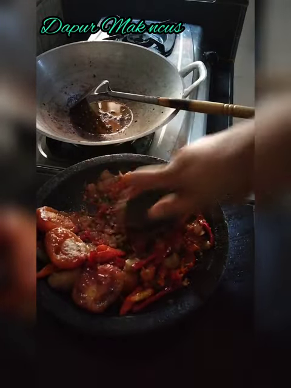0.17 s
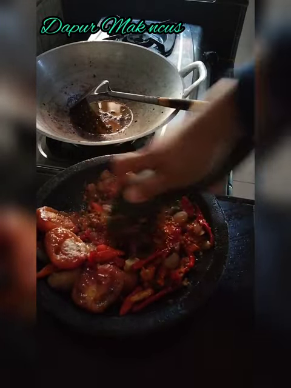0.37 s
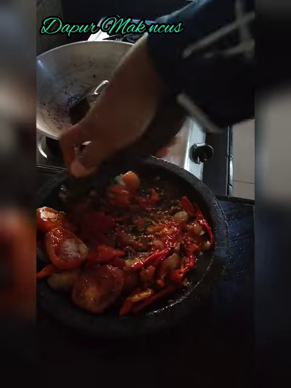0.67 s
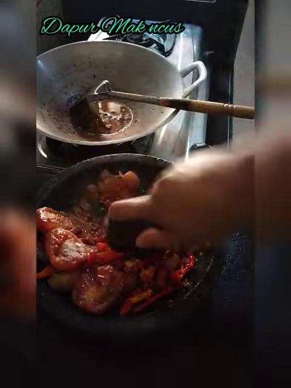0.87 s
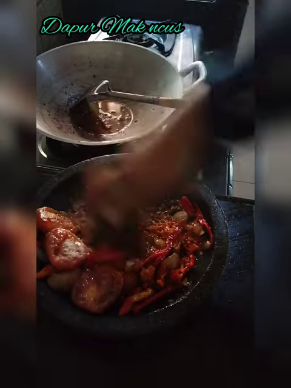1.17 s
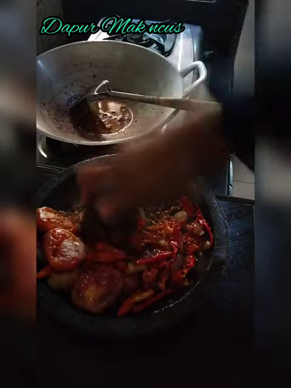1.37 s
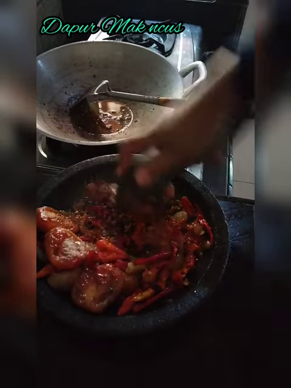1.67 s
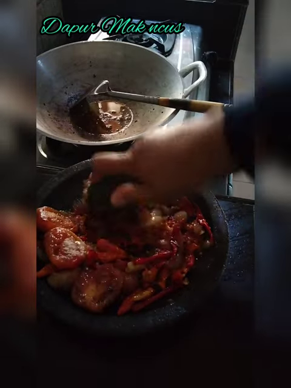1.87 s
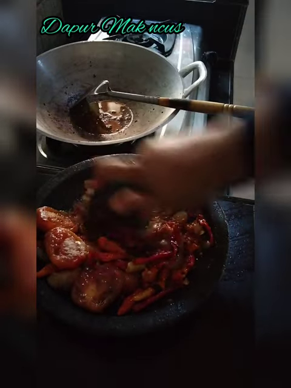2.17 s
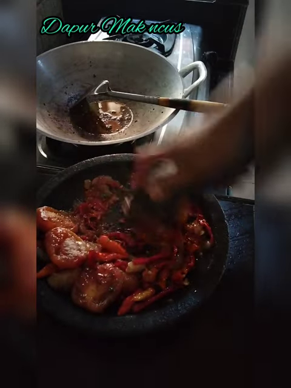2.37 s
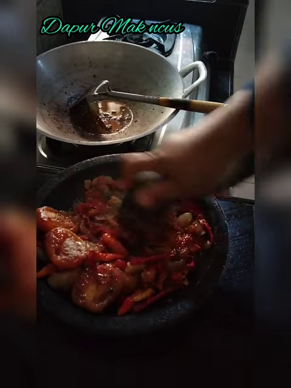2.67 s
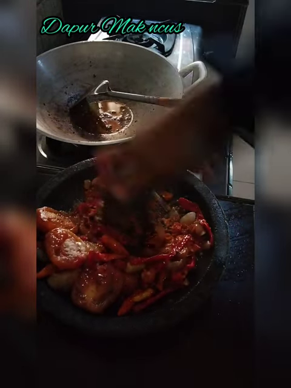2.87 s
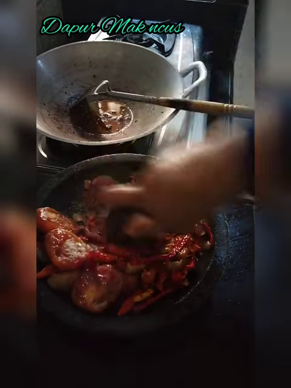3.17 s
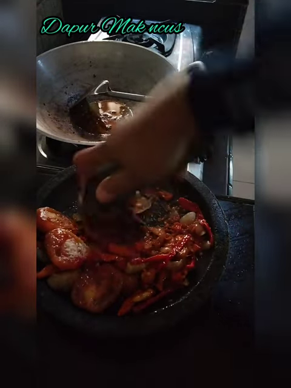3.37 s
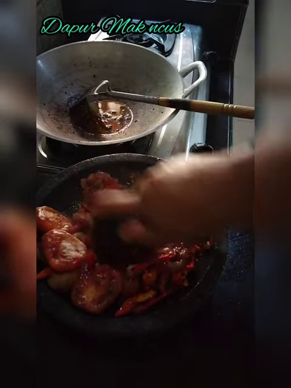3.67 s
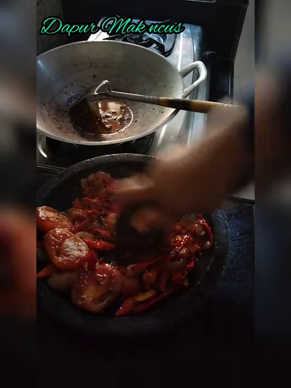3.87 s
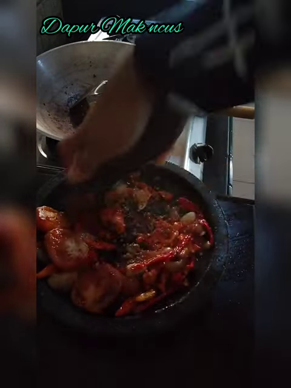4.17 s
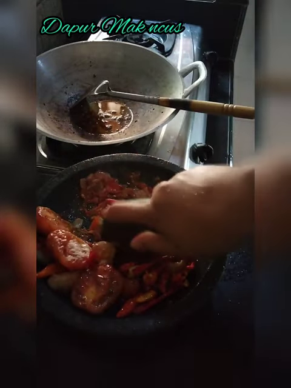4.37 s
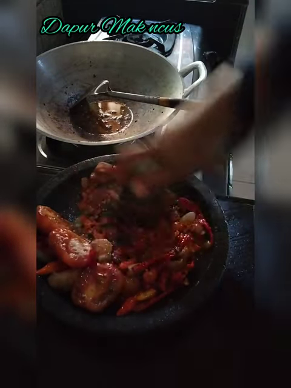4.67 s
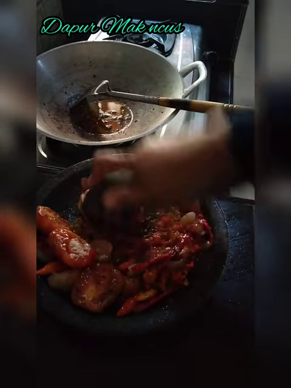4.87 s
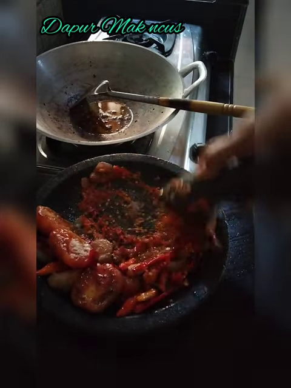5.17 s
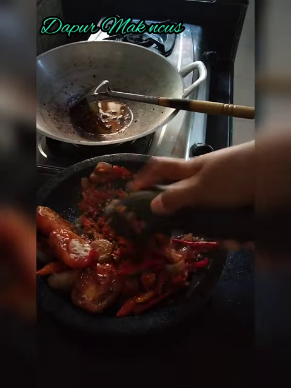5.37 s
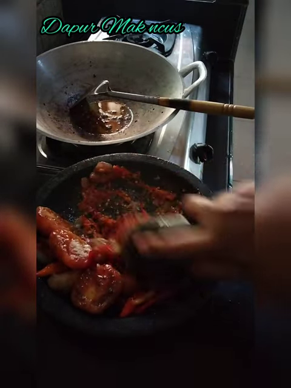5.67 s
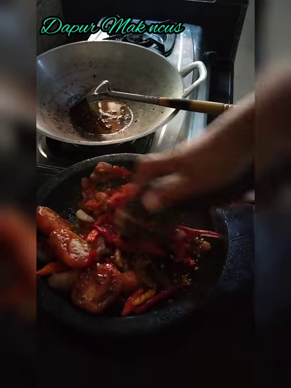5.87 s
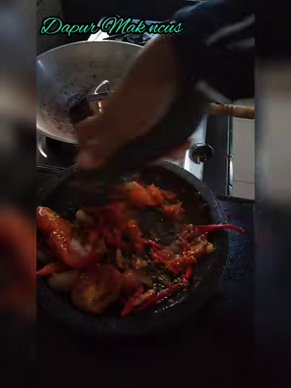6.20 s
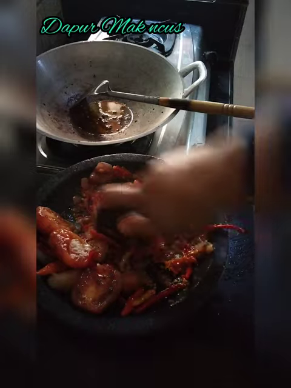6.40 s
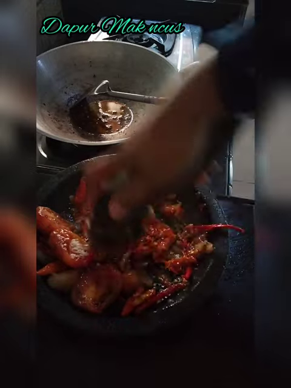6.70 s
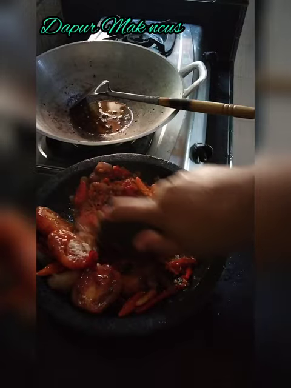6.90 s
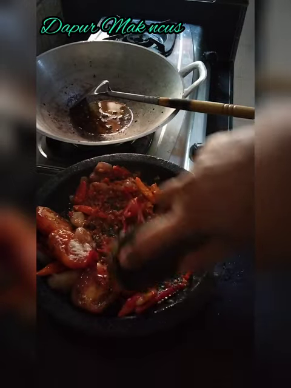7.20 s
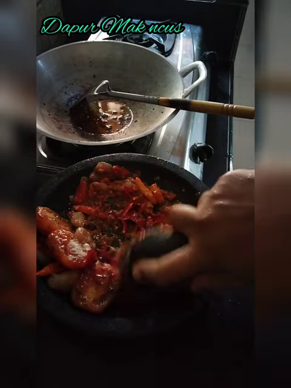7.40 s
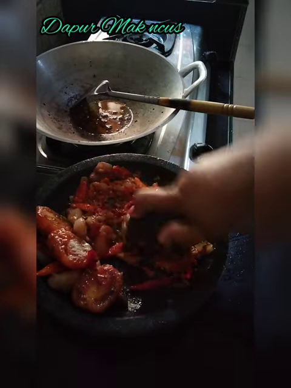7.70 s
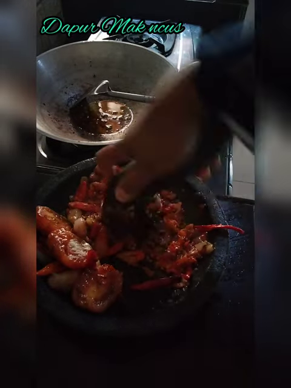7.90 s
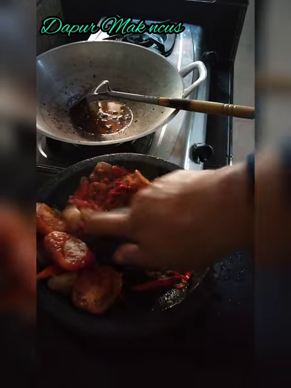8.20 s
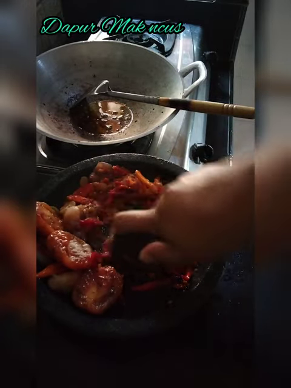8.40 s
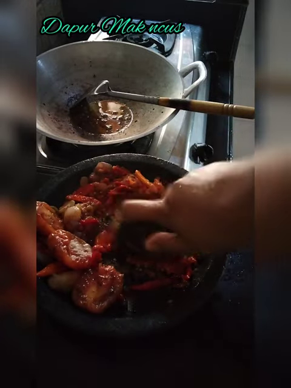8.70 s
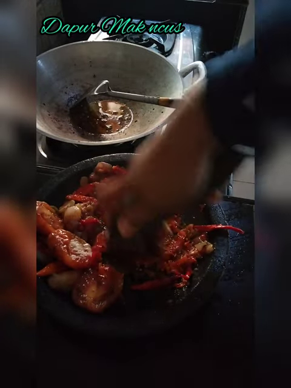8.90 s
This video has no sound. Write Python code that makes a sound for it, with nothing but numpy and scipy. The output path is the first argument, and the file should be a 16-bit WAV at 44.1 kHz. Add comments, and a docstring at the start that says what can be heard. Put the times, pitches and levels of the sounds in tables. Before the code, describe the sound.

A stone pestle crushes chillies and tomatoes in a stone mortar, heard close up in a small, quiet kitchen. From the start, uneven strokes come roughly every half second to second, each a soft, wet squelch with fizzing juice, dull rubbing and a low rumble through the worktop. Skins pop and snap throughout, now and then with a tiny squeak. Short, gritty scrapes come at about 0.2, 1.8 and 2.5 seconds. At 2.2 seconds stone hits stone with the loudest knock, a hard crack that rings briefly into the room, and another follows at 2.9 seconds. The mashing carries on with lighter taps around 4 to 4.5 seconds and crisp, juicy pops near 5 and 5.5 seconds. A third ringing knock lands at about 7.2 seconds, then squelching and popping continue until around 9 seconds.

```python
"""A stone pestle crushes chillies and tomatoes in a stone mortar, close by, in a small kitchen.
Each stroke squeezes air and juice out of the pulp with a squelch and makes the worktop rumble.
Skins pop and squeak, and juice spits. Where stone meets bare stone it grates or knocks,
and the bowl rings briefly into the quiet room."""
import sys
import numpy as np
from scipy import signal
from scipy.fft import rfft, irfft, next_fast_len
from scipy.io import wavfile
from scipy.ndimage import uniform_filter1d, map_coordinates

SR = 44100
rng = np.random.default_rng(int(sys.argv[2]) if len(sys.argv) > 2 else 0)


def file_out(sig):
    """Save sig as 16-bit WAV at sys.argv[1]."""
    # one column per channel
    cols = np.atleast_2d(sig).T
    # limit, then scale
    lim = np.clip(cols, -1, 1)
    pcm = np.round(lim * 32767).astype(np.int16)
    wavfile.write(sys.argv[1], SR, pcm)


N = 399105

# The tones the bowl rings with: pitch_hz, level_db, fade_s (a fade is the time to drop by 60 dB)
BOWL_TONES = [(780, -19.5, 0.016), (1325, -25.5, 0.086), (1554.2, -2, 0.066), (2090, -38, 0.038),
              (2710, -38, 0.048), (3300, -33, 0.088), (3406, -32.5, .07), (5060, -56.5, 0.12),
              (7160, -47, .12), (9320, -55, .04)]
# The tone colour of spraying juice: pitch_hz, level_db
FIZZ_COLOUR = [(2500, -25.5), (4200, -2.5), (5200, -2), (6200, -2.5), (7700, 2.5), (9000, -3),
               (12000, -9.5), (14500, -4), (16000, -9)]


def amp(db):
    """Turn decibels into a gain to multiply by."""
    return 10 ** (np.asarray(db) / 20)


def unit(x):
    """Scale a sound to an average (rms) level of 1."""
    return x / np.sqrt(np.mean(x ** 2) + 1e-20)


def along(points, hz):
    """Read between (pitch_hz, value) points on a logarithmic pitch scale."""
    pitches, values = np.transpose(points)
    return np.interp(np.log(hz + 1), np.log(pitches + 1), values)


def add(track, start_s, sound):
    """Mix a sound into a track."""
    start = max(round(start_s * SR), 0)
    part = track[start:start + len(sound)]
    part += sound[:len(part)]


def filtered(x, response):
    """Multiply each frequency in a sound by response(hz)."""
    size = next_fast_len(len(x) + 8192)
    return irfft(rfft(x, size) * response(np.fft.rfftfreq(size, 1 / SR)), size)[:len(x)]


def coloured(x, colour, size=4096):
    """Give a sound a tone colour; only the balance between the (pitch_hz, level_db) points counts."""
    cepstrum = irfft(np.log(amp(along(colour, np.fft.rfftfreq(size, 1 / SR)))))
    cepstrum[1:size // 2] *= 2  # folded so the filter never sounds ahead of its input
    cepstrum[size // 2 + 1:] = 0
    response = irfft(np.exp(rfft(cepstrum)))
    return signal.fftconvolve(x, response / np.linalg.norm(response))[:len(x)]


def resonant(x, peaks):
    """Pass a sound through resonances: pitch_hz, width_hz, level_db."""
    return filtered(x, lambda f: sum(amp(db) * 1j * f * width / (hz * hz - f * f + 1j * f * width)
                                     for hz, width, db in peaks))


def narrow_noise(samples, pitch_hz, width_hz):
    """Noise gathered around one pitch."""
    return unit(filtered(rng.standard_normal(samples), lambda f: np.exp(-((f - pitch_hz) / width_hz) ** 2)))


def wobble(per_s):
    """A smooth random curve through per_s points a second."""
    return map_coordinates(rng.standard_normal(int(N * per_s / SR) + 4), [np.arange(N) * per_s / SR])


def swells(rows):
    """A rounded rise and fall in level for each row."""
    gain = np.zeros(N)
    for start_s, length_s, db in rows:
        add(gain, start_s, amp(db) * signal.windows.tukey(int(length_s * SR) + 2, .5))
    return gain


def held(start_s, length_s, rise_s, fall_db_per_s):
    """The level of one hand movement: it rises, holds, and dies away after length_s."""
    gain, t = np.zeros(N), np.arange(int((length_s + 1) * SR)) / SR
    add(gain, start_s, np.minimum(t / rise_s, 1) * amp(-fall_db_per_s * np.maximum(t - length_s, 0)))
    return gain


def background():
    """A very quiet room, with a faint thin whistle now and then."""
    # When the whistle sounds: start_s, length_s, level_db
    whistles = [(1.75, 0.17, -68), (6.06, 0.099, -72.5), (7.03, 0.13, -85), (7.62, 0.29, -77)]
    # The tone colour of the room's air: pitch_hz, level_db
    air_colour = [(30, 1.5), (130, 10), (400, -17), (2000, -22), (16000, -21)]
    whistle = narrow_noise(N, pitch_hz=7300, width_hz=260)
    air = unit(coloured(rng.standard_normal(N), air_colour))
    return swells(whistles) * whistle + amp(-86) * air


def kitchen_echo(x, delay_s=.012, size=256):
    """The room answers with a wash of echoes, each pitch dying at its own speed."""
    # How long the room rings: pitch_hz, fade_s
    fades = [(100, 0.44), (400, 0.47), (1000, 0.96), (1600, 0.78), (3000, 0.78), (6000, 0.29),
             (14000, 0.45)]
    hz, t, bands = signal.stft(rng.standard_normal(SR), SR, nperseg=size)
    tail = signal.istft(bands * amp(-60 * t / along(fades, hz)[:, None]), SR, nperseg=size)[1]
    tail = np.pad(tail / np.linalg.norm(tail), (int(delay_s * SR), 0))
    return signal.fftconvolve(x, tail)[:len(x)]


def with_near_echoes(x, fade_s=.09, echo_db=-5.5):
    """Add quick echoes from worktop, wok and wall, keeping the same loudness."""
    t = np.arange(SR // 10) / SR
    echoes = rng.standard_normal(len(t)) * amp(-60 * t / fade_s)
    echoes *= amp(echo_db) / np.linalg.norm(echoes)
    echoes[0] = 1  # the direct sound
    return signal.fftconvolve(x, echoes / np.linalg.norm(echoes))[:len(x)]


def drag(rub_gain, roll_gain, rumble_gain):
    """The pressed pestle rolls over lumps: the worktop rumbles and the bowl rubs dully."""
    # The worktop's resonances: pitch_hz, width_hz, level_db
    worktop = [(72, 22, -6.5), (103, 20, 3.5), (150, 25, -7)]
    # The tone colours of rumbling, rolling and rubbing: pitch_hz, level_db
    rumble_colour = [(20, -36), (48, -16.5), (65, 1), (160, 3.5), (260, -13), (700, -45)]
    roll_colour = [(40, -42.5), (100, -9.5), (150, 4.5), (200, 3), (280, -4), (380, -6), (500, -27),
                   (1000, -51)]
    rub_colour = [(90, -22.5), (190, -3.5), (280, -9), (390, 7), (520, -9), (680, 2.5), (1000, -0.5),
                  (1300, -17.5), (2500, -42)]
    lumpy = lambda swing_db, per_s: rng.standard_normal(N) * amp(swing_db * wobble(per_s))
    rumble = unit(coloured(resonant(lumpy(2.5, 50), worktop), rumble_colour))
    roll = unit(coloured(lumpy(2.5, 50), roll_colour))
    rub = unit(coloured(lumpy(4.9, 140), rub_colour))
    return amp(-2) * rumble_gain * rumble + amp(-2.5) * roll_gain * roll + amp(-5.5) * rub_gain * rub


def bowl_ring(t, evenness=0):
    """The bowl's fading tones; evenness (0 to 1) brings the weak ones up towards the strong."""
    return sum(amp(db * (1 - evenness) - 60 * t / fade_s) * np.sin(2 * np.pi * hz * t)
               for hz, db, fade_s in BOWL_TONES)


def bowl_singing(squelch_gain, grit_per_s=700):
    """Seeds and grit under the sliding pestle keep the bowl ringing faintly."""
    grit = (rng.random(N) < grit_per_s / SR) * rng.standard_normal(N)
    ring = bowl_ring(np.arange(SR // 5) / SR, evenness=.45)
    return amp(-9.5) * signal.fftconvolve(unit(grit) * squelch_gain, ring / np.linalg.norm(ring))[:N]


def thumps(fade_s=0.15):
    """The pestle lands on a cushion of pulp, sending a short, low push through bowl and worktop."""
    # The soft landings: start_s, level_db
    landings = [(0.563, -51.5), (1.022, -51), (1.82, -57), (4.044, -59.5), (4.633, -50.5)]
    # Their tone colour: pitch_hz, level_db
    thump_colour = [(40, -43), (120, -0.5), (220, 2), (400, -5.5), (800, -41), (3000, -57.5)]
    track, t = np.zeros(N), np.arange(SR // 4) / SR
    for start_s, db in landings:
        push = rng.standard_normal(len(t)) * amp(-60 * t / fade_s)
        add(track, start_s, amp(db) * coloured(push, thump_colour))
    return track


def squeaks():
    """A wet chilli skin sticks and slips as it escapes from under the pestle."""
    # The slipping skins: start_s, length_s, level_db, pitch_hz
    slips = [(3.472, .018, -50, 2450), (4.124, 0.028, -62, 1980), (6.31, .024, -56.5, 3060),
             (8.045, .04, -57, 3400)]
    track = np.zeros(N)
    for start_s, length_s, db, hz in slips:
        slip = narrow_noise(int(length_s * SR) + 2, hz, width_hz=.12 * hz)
        add(track, start_s, amp(db) * slip * signal.windows.tukey(len(slip), .5))
    return track


def grating(slips_per_s=1400, hiss=0.35):
    """Grains of bare stone catch and break free; each slip jolts the bowl."""
    # The scrapes: start_s, length_s, level_db
    scrapes = [(.075, .046, -56.5), (.172, 0.024, -49), (.186, 0.027, -42.5), (.218, .048, -42),
               (1.818, 0.051, -37.5), (1.985, 0.022, -57.5), (2.515, 0.047, -46.5)]
    # The stone's resonances: pitch_hz, width_hz, level_db
    stone = [(474, 54, 1), (663.7, 45, -1.5), (881, 110, -5.5), (1540, 34, 4.5), (2800, 68, -9.5),
             (3220, 120, -13.5), (4700, 320, -21.5), (6870, 440, -24.5)]
    # The tone colour laid over them: pitch_hz, level_db
    rasp_colour = [(100, -10), (300, 0.5), (3500, 2), (4200, -7.5), (8000, -4.5), (11000, -23),
                   (16000, -11)]
    slips = unit((rng.random(N) < slips_per_s / SR) * rng.standard_normal(N))
    slips += hiss * rng.standard_normal(N)
    rasp = resonant(slips * swells(scrapes), stone) / np.std(resonant(slips, stone))
    return filtered(rasp, lambda hz: amp(along(rasp_colour, hz)))


def pops(squelch_gain, small_per_s=9, small_hz=2800, rise_s=0.00053, fade_s=.042):
    """A skin gives way: a quick cluster of snaps in a small wet hollow, with a spray of droplets."""
    # The loudest bursting skins: start_s, level_db, pitch_hz, spray_db
    big_pops = [(0.026, -45.5, 2080, -77), (.38, -35.5, 2820, -55.5), (0.7358, -38.5, 2760, -66),
                (0.8076, -36, 3020, -56), (0.83, -37.5, 3000, -52), (1.0274, -37.5, 2830, -60),
                (1.4165, -52, 7900, -59.5), (1.515, -50, 2800, -48), (2.048, -40, 1730, -48.5),
                (2.911, -33.5, 1830, -47), (3.0744, -38.5, 2820, -64.5), (3.4812, -39.5, 2350, -66),
                (3.538, -37, 1820, -54), (3.7323, -47, 1900, -49), (4.2917, -34.5, 2800, -59),
                (4.3203, -33, 2970, -52.5), (4.9588, -27, 6850, -44), (5.054, -39, 3056, -63),
                (5.447, -31, 3110, -47.5), (5.7773, -51, 1825, -52), (6.1485, -38.5, 6810, -64),
                (6.6468, -43, 2950, -52), (6.8823, -38.5, 2670, -65), (7.2465, -49.5, 2775, -48.5),
                (7.2702, -34, 2210, -43), (7.321, -36.5, 7850, -46), (7.938, -33.5, 2970, -44.5),
                (7.9832, -39, 3870, -48.5), (8.292, -41.5, 2820, -57), (8.8, -33.5, 2570, -47.5)]
    hollow_colour = [(500, -23.5), (1300, 8.5), (5000, -2.5), (15000, -10.5)]  # pitch_hz, level_db
    track, t = np.zeros(N), np.arange(SR // 10) / SR
    small_pops = []  # smaller skins and seeds go at random, louder when the pulp is pressed harder
    for when, size, pitch in rng.random((int(small_per_s * N / SR), 3)):
        pressed_db = 20 * np.log10(squelch_gain[int(when * N)] + 1e-9) + 6 * (size - .5)
        hz = small_hz * 2 ** (.7 * (pitch - .5))
        small_pops.append((when * N / SR, pressed_db + 7.5, hz, pressed_db + 2))
    shape = (1 - np.exp(-t / rise_s)) * amp(-60 * t / fade_s)
    for start_s, db, hz, spray_db in big_pops + small_pops:
        snaps, drops = rng.standard_normal((2, len(t))) * amp(3.914 * rng.standard_normal((2, len(t))))
        hollow = coloured(resonant(snaps * shape, [(hz, 0.33 * hz, 0)]), hollow_colour)
        pop = amp(db - 5.5) * hollow / np.abs(hollow).max()
        spray = amp(spray_db - 1.5) * unit(coloured(drops, FIZZ_COLOUR)) * shape
        add(track, start_s - .001, pop + spray)
    return track


def knocks(impact=8, chatter=.5, ring_rise_s=.001):
    """Stone hits stone and chatters briefly: a dull thud, a hard crack and the ring of the bowl."""
    # The hits: start_s, ring_db, thud_db, crack_db
    hits = [(0.38, -57, -44.5, -47), (0.784, -57, -60, -44), (1.621, -47, -54.5, -43),
            (1.791, -41.5, -42.5, -56), (1.823, -32, -39, -41), (2.2188, -4.5, -17.5, -10),
            (2.891, -11, -18.5, -26.5), (3.867, -39, -59, -60), (4.31, -39.5, -45.5, -65),
            (4.446, -34, -52, -37.5), (4.958, -44, -68, -39.5), (7.171, -10, -27, -49)]
    # The tone colours of the blow through bowl and worktop, and of the crack: pitch_hz, level_db
    thud_colour = [(30, -49.5), (120, -19.5), (200, -9), (420, -5), (650, -3.5), (1000, 3), (1350, 5),
                   (1900, -26.5), (4000, -45.5), (16000, -58.5)]
    crack_colour = [(300, -15), (1100, -11.5), (1400, 0.5), (2000, 2), (2400, -4), (2850, -3), (3350, 0.5),
                    (3800, -33.5), (4400, -38.5), (5000, -16), (5800, -41), (16000, -49.5)]
    track, t = np.zeros(N), np.arange(SR) / SR
    force = lambda fade_s: (impact * (t == 0)
                            + chatter * rng.standard_normal(len(t)) * amp(-60 * t / fade_s))
    for start_s, ring_db, thud_db, crack_db in hits:
        ring = amp(ring_db) * bowl_ring(t) * (1 - np.exp(-t / ring_rise_s))
        thud = amp(thud_db) * coloured(force(fade_s=0.028), thud_colour)
        crack = amp(crack_db - 4) * coloured(force(fade_s=0.027), crack_colour)
        # the ring beams up out of the bowl; the blow spreads all round, so it echoes more
        room = kitchen_echo(amp(-11.5) * ring + amp(-9.5) * thud + amp(-8.5) * crack)
        add(track, start_s, ring + thud + crack + room)
    return track


def pestle_effort(push_rise_s=0.061):
    """How hard the hand works, as five gain curves: squelch, fizz, rubbing, rolling and rumble."""
    # The pestle is set down, slides and is lifted (the rows at 7.927 s and 8.338 s are one stroke, the hand
    # changing direction midway): # start_s, length_s, squelch_db, fizz_over_squelch_db, rub_db, rumble_db,
    # roll_db
    strokes = [(-0.022, 0.53, -72, -4, -80, -67.5, -64), (0.588, 0.67, -71.5, 0.5, -69, -66, -62.5),
               (1.419, 0.68, -64.5, -2.5, -83.5, -75, -64.5), (2.211, 0.49, -62, -4, -61.5, -62, -63),
               (2.884, 0.31, -64.5, 1, -64, -67.5, -61.5), (3.369, 0.54, -67, -5, -69, -67.5, -67),
               (4.04, 0.7, -67.5, -2.5, -70, -62, -64.5), (4.946, .17, -68.5, 5, -83, -68, -93),
               (5.424, .52, -65.5, 0.5, -79, -69, -75), (6.132, .3, -64, -1.5, -69.5, -62.5, -76.5),
               (6.626, 0.27, -65.5, -7, -80.5, -60, -74.5), (7.156, 0.59, -66, -3, -72, -59.5, -73.5),
               (7.927, 0.32, -63, -3.5, -85, -95, -95), (8.338, .33, -68, -0.5, -83.5, -72, -70),
               (8.815, 0.18, -65.5, -2.5, -96, -66, -87)]
    # The wrist rocks and bears down: start_s, length_s, squelch_db, fizz_db, rub_db
    pushes = [(0.033, 0.08, -59.5, -62.5, -57.5), (0.169, 0.14, -54.5, -66.5, -55.5),
              (0.322, 0.1, -62, -63, -56), (0.586, 0.1, -58, -62, -62.5), (.725, 0.027, -57.5, -61.5, -55),
              (0.779, 0.059, -58, -63, -55), (1.01, 0.073, -55, -62, -56.5),
              (1.134, 0.066, -59.5, -62.5, -68), (1.589, 0.079, -57.5, -67.5, -59.5),
              (1.79, 0.062, -55.5, -67, -46), (1.95, .1, -59.5, -66, -55), (2.52, 0.059, -56, -67.5, -56.5),
              (3.102, 0.021, -68.5, -59.5, -57.5), (3.458, 0.091, -54.5, -61.5, -57),
              (3.689, 0.039, -58.5, -60.5, -78), (3.804, .05, -61.5, -63, -65),
              (4.089, 0.084, -56.5, -68, -65), (4.244, 0.095, -60, -62.5, -56),
              (4.453, 0.12, -58.5, -63, -65), (4.615, 0.078, -61, -60.5, -64),
              (5.041, 0.049, -65, -88, -83), (5.501, 0.11, -61.5, -70, -65), (5.69, 0.12, -68, -71, -98),
              (5.846, .075, -66, -69, -68.5), (6.292, 0.065, -60.5, -74.5, -62),
              (6.367, .06, -75, -67, -66), (6.729, 0.086, -61, -65, -78), (7.276, .075, -56, -58.5, -56.5),
              (7.375, .05, -57.5, -69.5, -61.5), (7.523, 0.028, -55, -62.5, -66),
              (7.63, .075, -61, -62.5, -65), (7.973, 0.052, -67, -60.5, -91), (8.046, 0.031, -55, -69, -67),
              (8.143, 0.063, -58, -62, -65), (8.282, 0.047, -57, -61.5, -56),
              (8.423, 0.06, -65.5, -64, -65), (8.577, 0.046, -63, -60, -59),
              (8.899, 0.094, -63.5, -62, -64)]
    power = np.zeros((5, N))
    for start_s, length_s, squelch_db, fizz_over_db, rub_db, rumble_db, roll_db in strokes:
        # the pulp sounds at once; the worktop answers more slowly
        slide = held(start_s, length_s, rise_s=.008, fall_db_per_s=153.5)
        power[:3] += np.outer(amp([squelch_db, squelch_db + fizz_over_db, rub_db]), slide) ** 2
        power[3] += (amp(roll_db) * held(start_s, length_s, rise_s=0.06, fall_db_per_s=93)) ** 2
        power[4] += (amp(rumble_db) * held(start_s, length_s, rise_s=0.06, fall_db_per_s=57)) ** 2
    for start_s, length_s, squelch_db, fizz_db, rub_db in pushes:
        push = held(start_s - push_rise_s / 2, length_s + push_rise_s / 2, push_rise_s, fall_db_per_s=274)
        roll_db = rub_db - 10.5
        power[:4] += np.outer(amp([squelch_db, fizz_db, rub_db, roll_db]), push) ** 2
    return np.sqrt(power)


def bubbles(per_s, pitch_hz, spread, cycles, scatter_db, rise, size=300):
    """Tiny bubbles burst at random, each a fading tone that rises in pitch."""
    count = int(per_s * N / SR)
    start = rng.integers(0, N, (count, 1))
    pitch = np.clip(pitch_hz * np.exp(spread * rng.standard_normal((count, 1))), 300, SR / 3)
    strength = amp(scatter_db * np.minimum(rng.exponential(size=(count, 1)), 3))
    age = pitch * np.arange(size) / SR / cycles
    phase = 2 * np.pi * cycles * (age + rise * (age - 1 + np.exp(-age)))
    waves = strength * np.exp(-age) * np.sin(phase)
    return unit(np.bincount((start + np.arange(size)).ravel(), waves.ravel(), N)[:N])


def squelch(squelch_gain, fizz_gain, film_hiss=0.43, pocket_swing_db=7.5):
    """Air and juice are squeezed from the pulp: clumps of bubbles over the hiss of a sliding wet film."""
    # The tone colour of wet pulp: pitch_hz, level_db
    pulp_colour = [(500, -30), (1000, -10), (1200, -6), (1500, 4), (1800, -5), (2400, -4), (3100, 2.5),
                   (3900, -1), (5500, -12.5), (9000, -45)]
    # Air pockets that open and close, each with its own resonance: pitch_hz, width_hz, level_db
    air_pockets = [(1138, 370, -9), (1950, 260, -5.5), (2450, 840, -6), (2760, 780, -0.5), (3270, 300, -3),
                   (4460, 990, -6)]
    clumps_db = 2.3 * wobble(110)
    bubbling = bubbles(per_s=1300, pitch_hz=2275, spread=.45, cycles=3.6, scatter_db=-0.5, rise=.12)
    spray = bubbles(per_s=4100, pitch_hz=7550, spread=0.49, cycles=4.5, scatter_db=-2.5, rise=0.11)
    wet = bubbling + film_hiss * rng.standard_normal(N)
    pockets = unit(sum(resonant(wet, [pocket]) * amp(pocket_swing_db * np.tanh(wobble(per_s=16)))
                       for pocket in air_pockets))
    body = unit(unit(coloured(wet, pulp_colour)) + amp(-4) * pockets)
    fizz = unit(coloured(spray + 0.65 * rng.standard_normal(N), FIZZ_COLOUR))
    body *= amp(clumps_db - 1.5)
    fizz *= amp(clumps_db + 1.2 * wobble(220) - 2.84)
    return squelch_gain * body + fizz_gain * fizz


def scene():
    """The pestle works in the bowl, close by, and the kitchen answers; one channel."""
    squelch_gain, fizz_gain, rub_gain, roll_gain, rumble_gain = pestle_effort()
    grate = grating()
    skins = pops(squelch_gain) + squeaks()
    room = kitchen_echo(amp(-15) * grate + amp(-17.5) * skins)
    pulp = with_near_echoes(squelch(squelch_gain, fizz_gain))
    sliding = bowl_singing(squelch_gain) + drag(rub_gain, roll_gain, rumble_gain)
    return (knocks() + thumps() + grate + skins + room + pulp + sliding + background())[None]


def record(dry, low_cut_hz=52, top_hz=15650, size=512):
    """A noise suppressor turns down the faintest bands; deep bass and the highest treble are cut."""
    # Bands quieter than this are turned down: pitch_hz, level_db
    hush_levels = [(100, -102), (500, -102), (1500, -93.5), (5000, -104), (15000, -116)]
    band_hz, _, bands = signal.stft(dry[0], SR, nperseg=size)
    power = uniform_filter1d(np.abs(bands) ** 2, size=9, axis=0)  # smooth across pitch
    power = np.abs(uniform_filter1d(power, size=3, axis=1))  # then across time
    threshold = amp(along(hush_levels, band_hz))[:, None] ** 2
    hushed = signal.istft(bands * np.sqrt(power / (power + threshold)), nperseg=size)[1][:N]
    low_cut = signal.butter(4, low_cut_hz, "highpass", fs=SR, output="sos")
    return filtered(signal.sosfilt(low_cut, hushed), lambda hz: hz < top_hz)[None]


dry = scene()
out = record(dry)
file_out(out)
```